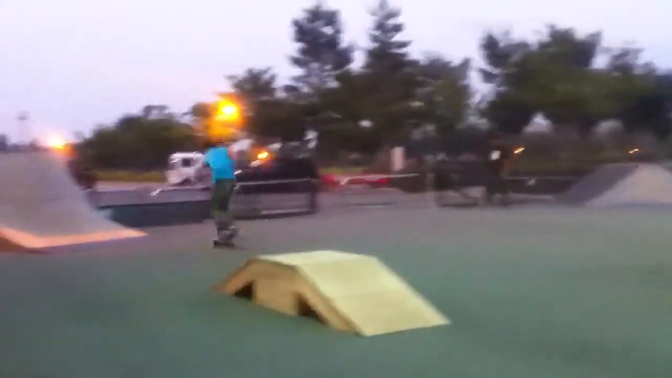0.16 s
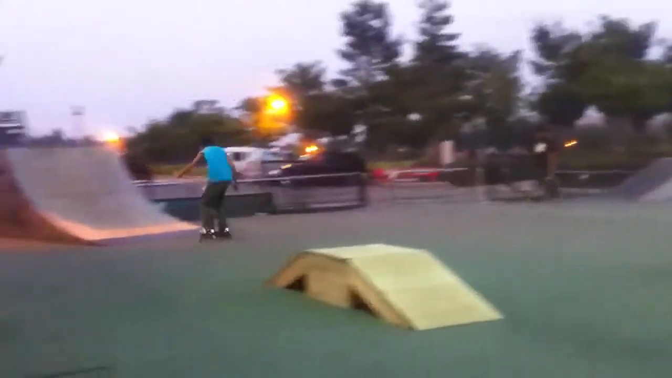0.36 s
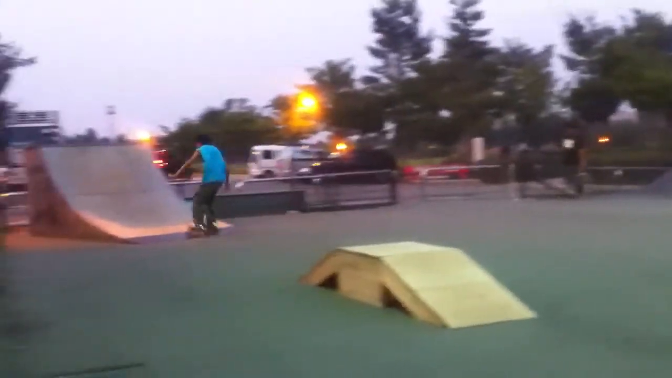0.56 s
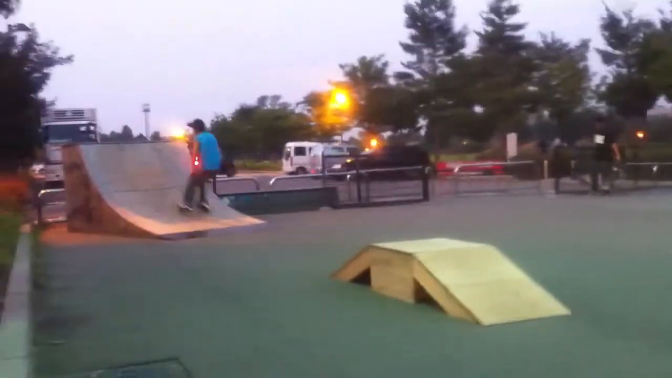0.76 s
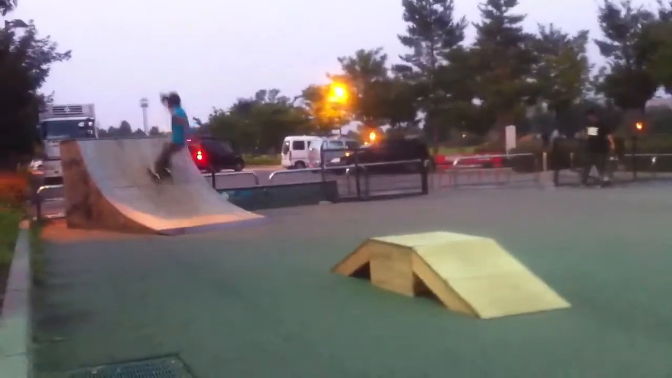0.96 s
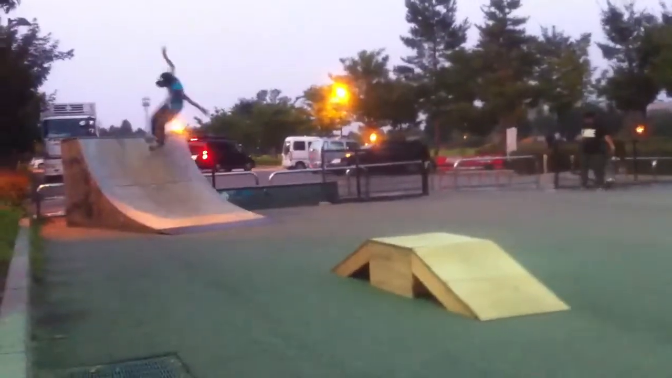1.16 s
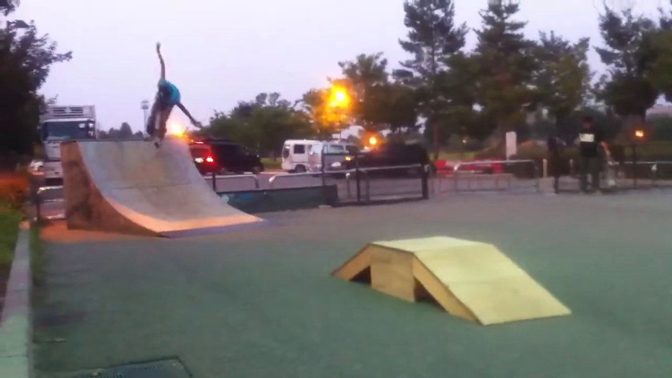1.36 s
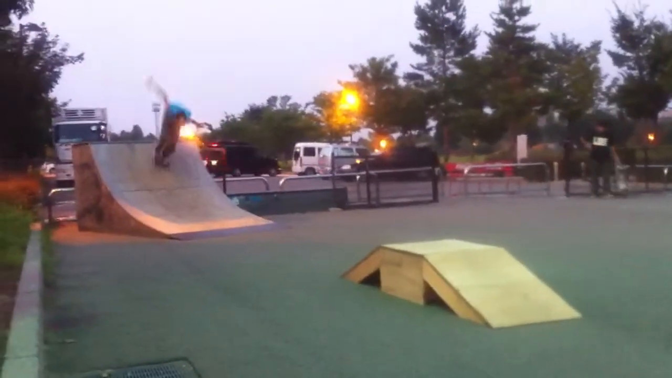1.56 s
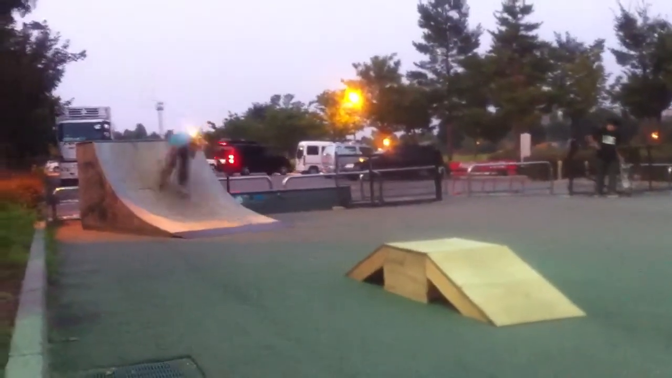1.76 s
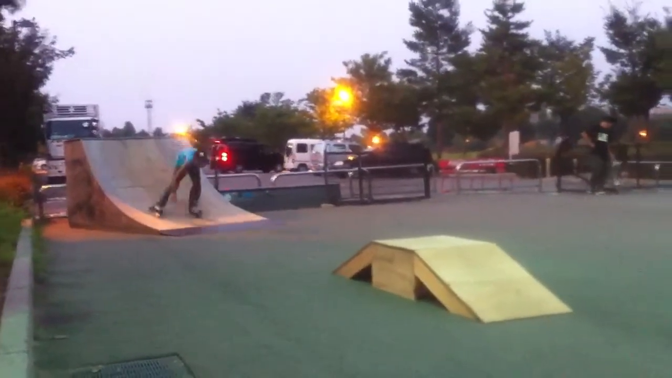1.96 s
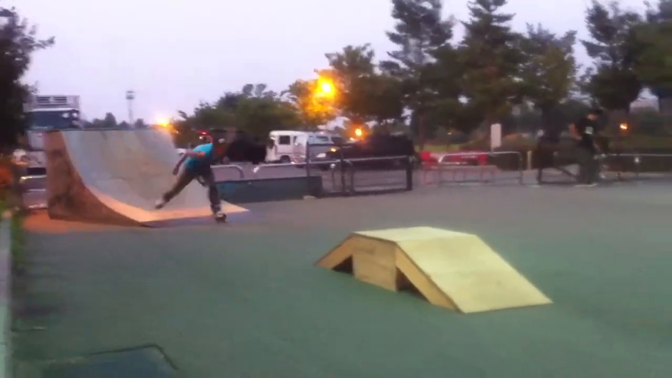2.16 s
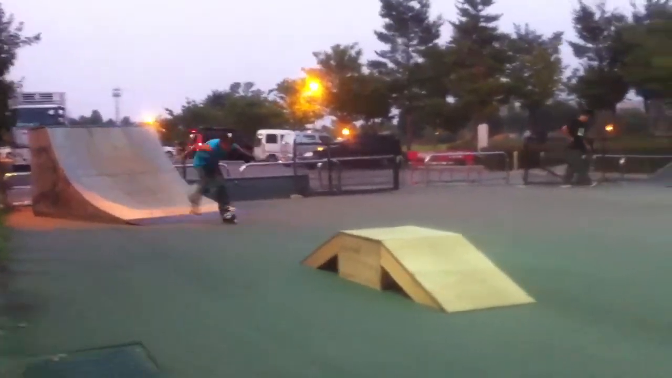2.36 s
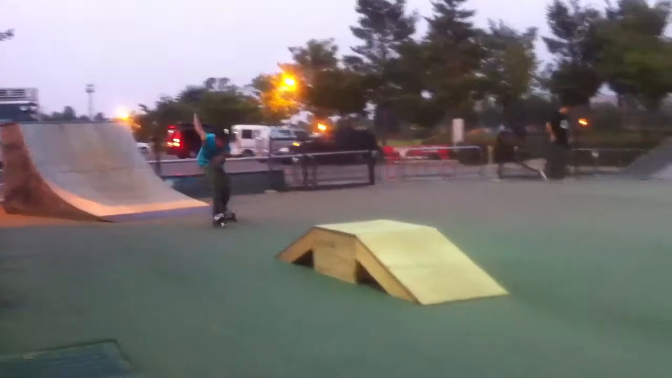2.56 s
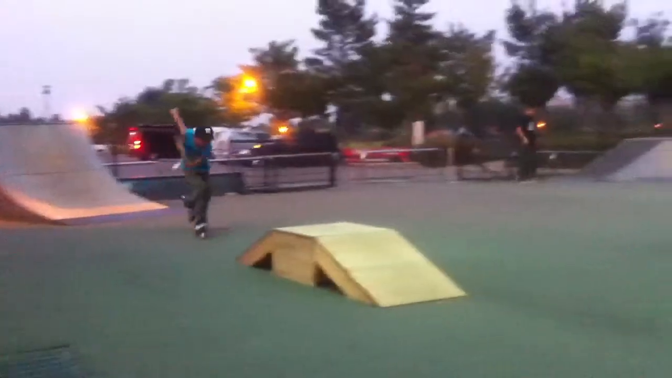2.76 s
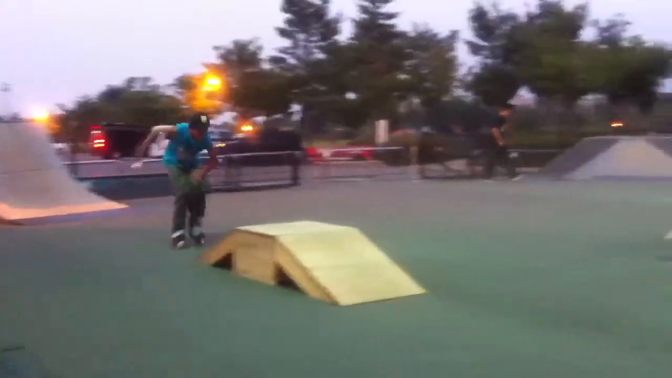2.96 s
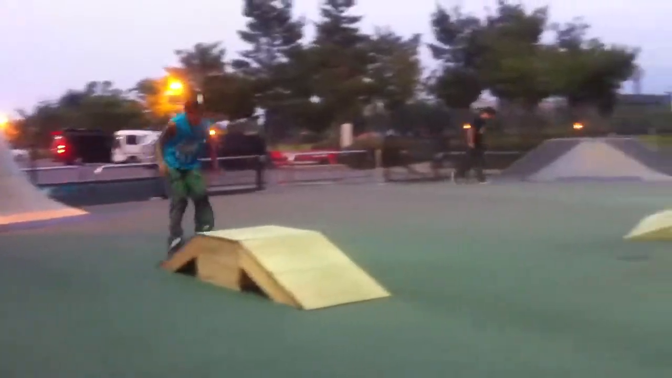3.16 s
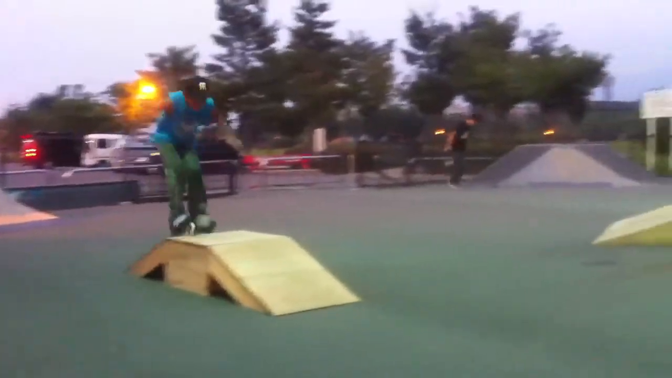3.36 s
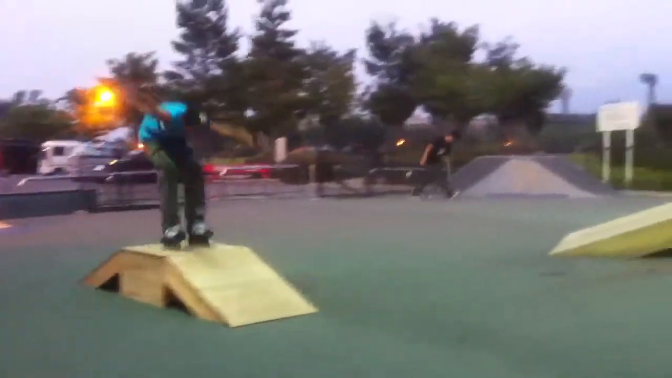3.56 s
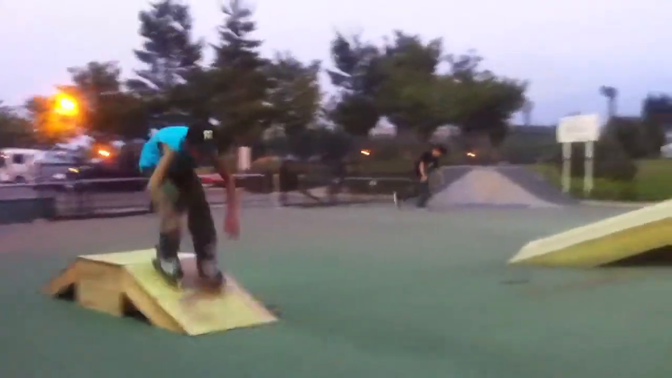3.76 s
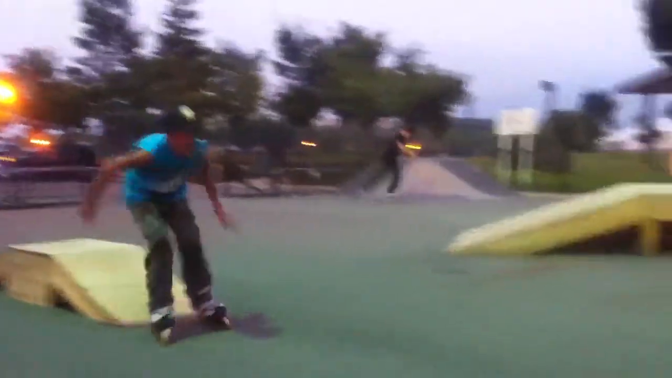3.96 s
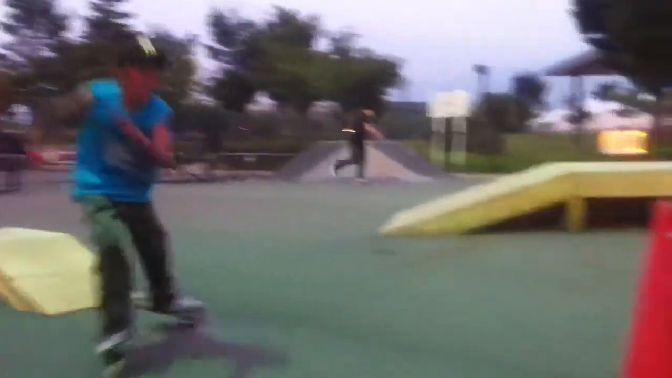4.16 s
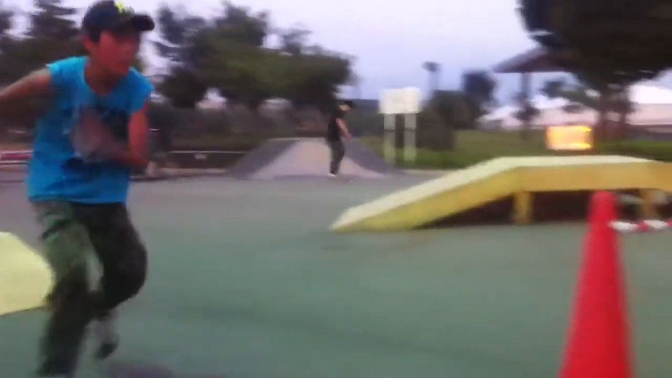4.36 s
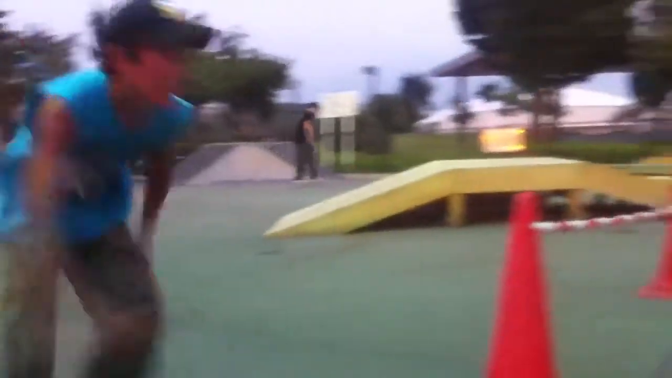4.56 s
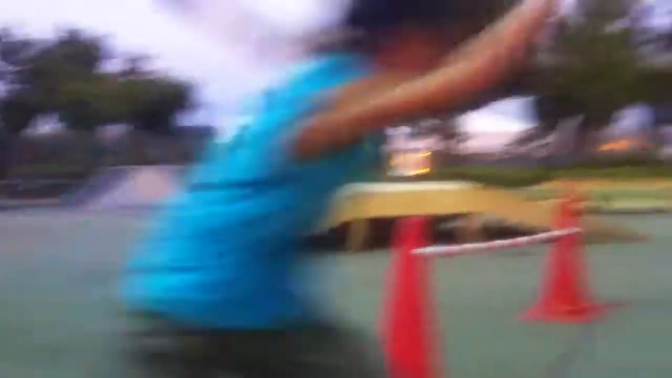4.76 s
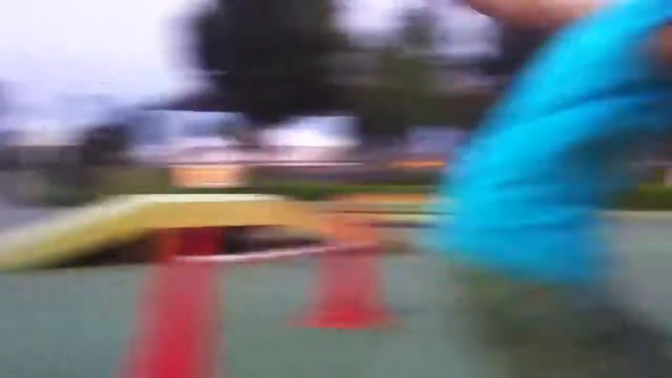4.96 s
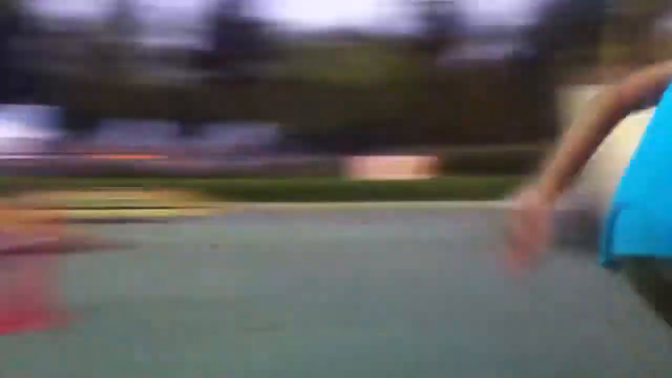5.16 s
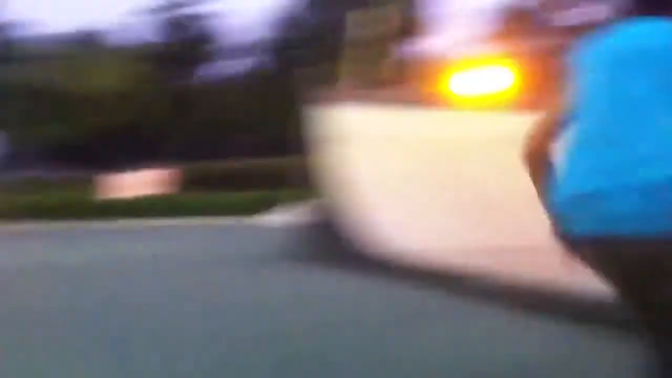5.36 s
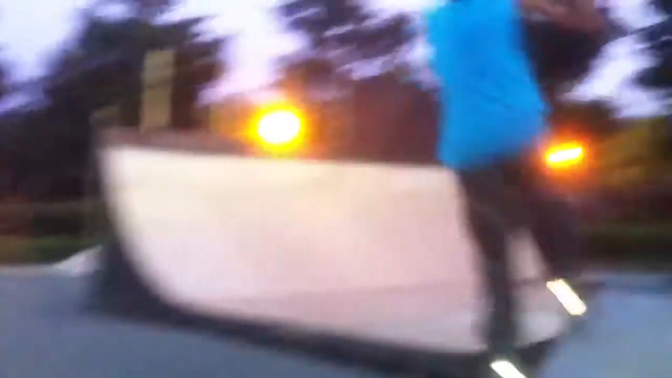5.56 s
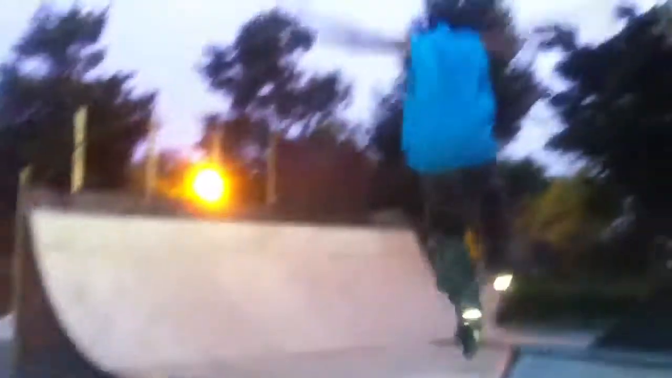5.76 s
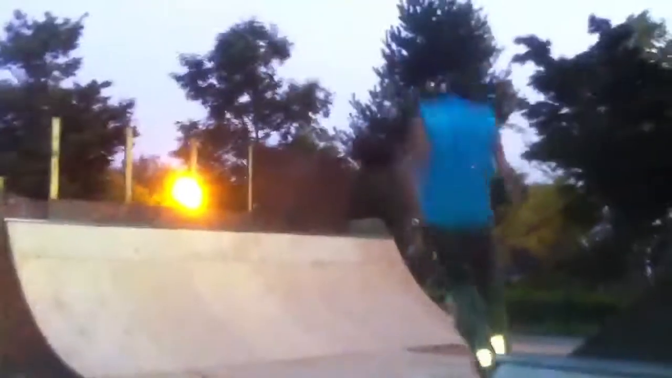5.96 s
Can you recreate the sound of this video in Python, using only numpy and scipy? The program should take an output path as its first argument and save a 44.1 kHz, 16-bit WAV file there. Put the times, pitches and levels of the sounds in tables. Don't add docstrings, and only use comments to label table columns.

```python
import sys
import numpy as np
from scipy import signal
from scipy.fft import rfft, irfft
from scipy.io import wavfile
from scipy.ndimage import uniform_filter1d

SR = 44100
rng = np.random.default_rng(int(sys.argv[2]) if len(sys.argv) > 2 else 0)


def gain_from_decibels(decibels):
    exponent = np.asarray(decibels, float) / 20
    return 10 ** exponent


def file_out(sig):
    cols = np.atleast_2d(sig).T
    lim = np.clip(cols, -1, 1)
    pcm = np.round(lim * 32767).astype(np.int16)
    wavfile.write(sys.argv[1], SR, pcm)


N = 264688
ON_NEAR_RAMP_S = 5.3


def evened(x):
    return x / np.sqrt(np.mean(x ** 2) + 1e-20)


def curve(rows):
    t, db = np.transpose(rows)
    return gain_from_decibels(np.interp(np.arange(N) / SR, t, db, left=-120, right=-120))


def swells(rows):
    coarse = np.arange(0, N + 32, 32)
    t = coarse / SR
    level = 0
    for peak_s, db, rise, fall in rows:
        away = np.maximum((peak_s - t) / max(rise, .002), (t - peak_s) / max(fall, .002))
        level = level + gain_from_decibels(db - 20 * away)
    return np.interp(np.arange(N), coarse, level)


def add(mix, s, sound):
    part = mix[round(s * SR):][:len(sound)]
    part += sound[:len(part)]


def highpass(x, order, hz):
    return signal.sosfilt(signal.butter(order, hz, "high", fs=SR, output="sos"), x)


def ring(x, modes):
    out = 0
    for hz, width, db in modes:
        pole = np.exp((2j * np.pi * hz - np.pi * width) / SR)
        mode = signal.lfilter([1 - abs(pole)], [1, -pole], x + 0j).real
        out = out + gain_from_decibels(db) * 2 * mode
    return out


def coloured(x, colour):
    hz, db = np.transpose(colour)
    bins = np.fft.rfftfreq(len(x), 1 / SR)
    gain = gain_from_decibels(np.interp(np.log(bins + 1), np.log(hz), db))
    return evened(irfft(rfft(x) * gain, len(x)))


def flutter(size, db):
    smooth = uniform_filter1d(uniform_filter1d(rng.standard_normal(N), size), size)
    return gain_from_decibels(db * evened(smooth))


def steadied(x, share):
    power = uniform_filter1d(x ** 2, size=900)
    return evened(x / (power + .02) ** (share / 2))


def grit(per_s, spread_db):
    size = gain_from_decibels(spread_db * np.minimum(rng.exponential(1, N), 5))
    return size * rng.standard_normal(N) * (rng.random(N) < per_s / SR)


# (f/Hz, level/dB)
WASH = [(15, -50), (25, -40), (53, -29), (138, -2.5), (213, -2), (338, -14), (783, -9.5), (872, -9.5),
        (1110, -12.5), (1540, -22.5), (2510, -26.5), (9230, -33), (15000, -59), (16300, -47)]
# (t/s, level/dB)
HUM = [(0, -62.5), (1.2, -57), (1.33, -53.5), (1.55, -53), (1.7, -54), (2.7, -57), (3.1, -94), (6, -50)]


def traffic():
    wash = coloured(rng.standard_normal(N), WASH) * flutter(size=3000, db=0.8)
    motor = evened(ring(rng.standard_normal(N), [(213, 5, 0)]))
    return gain_from_decibels(-55) * wash + curve(HUM) * steadied(motor, share=0.71)


# (f/Hz, level/dB)
PUFF_COLOUR = [(15, -2), (30, 10), (50, -1), (80, -1), (140, -45)]
# (peak t/s, level/dB, rise time/s per 20 dB, fall time/s per 20 dB)
PUFFS = [(.65, -64, 0.5, 1), (1.7, -58, -0.4, .08), (2.2, -67, -1.2, 0.7), (3.26, -56, .02, 0),
         (3.67, -61, 0.5, .08), (4.05, -62, -0.8, 0.4), (4.15, -68, 0.5, -0.5), (5.19, -67, 0.5, 0),
         (5.33, -52, 0, -1), (5.46, -48, 0.16, 0.5), (5.715, -60, -1.9, -1.7), (1.17, -62, -0.5, 0),
         (1.8, -60, 0, 0.5), (2.08, -62, -1.5, -0.2), (2.62, -62, -1.5, -0.5), (3.76, -62, -0.5, .06),
         (4.85, -61, 0, -0.5)]


def puffs():
    return coloured(rng.standard_normal(N), PUFF_COLOUR) * swells(PUFFS)


# (t/s, peak level/dB, centre f/Hz)
TICKS = [(0.481, -38.5, 3260), (1.047, -37.5, 3770), (1.7552, -36, 3080), (3.17, -41, 2270),
         (3.888, -44, 2310), (3.924, -39, 2380), (3.9968, -36, 2200), (4.817, -34, 2930),
         (4.9863, -47, 2260), (5.1783, -30, 2830), (5.789, -37, 2310)]
# (t/s, peak level/dB, centre f/Hz)
FINE_TICKS = [(0.046, -40.5, 7100), (.213, -46, 5540), (0.744, -37.5, 7600), (1.01, -41.5, 4620),
              (1.457, -37, 5800), (1.8023, -40, 5640), (1.8385, -39, 5200), (1.888, -46, 4790),
              (1.9644, -40.5, 5210), (2.061, -44, 5890), (2.1375, -45, 6130), (2.412, -49.5, 5560),
              (2.459, -42, 4750), (2.4698, -41, 4800), (2.786, -44, 4800), (4.9094, -45, 7490),
              (5.161, -40, 4720), (5.8661, -41.5, 5400), (5.9685, -42, 11000)]


def ticks():
    out, t = np.zeros(N), np.arange(2048) / SR
    for s, db, hz in TICKS + FINE_TICKS:
        t60 = 0.016 * (2500 / hz) ** 0.31
        colour = [(hz / 4, -32), (hz / 1.3, -7), (hz, 0), (hz * 1.3, -5), (hz * 4, -22)]
        puff = coloured(rng.standard_normal(len(t)), colour)
        add(out, s - .001, puff * gain_from_decibels(db - 4 - 60 * t / t60) * np.minimum(t * 1500, 1))
    return out


def rattle(rows, top_hz, tilt):
    t, out = np.arange(700) / SR, 0
    for hz in np.geomspace(900, top_hz, num=15):
        clink = np.sin(2 * np.pi * hz * t) * gain_from_decibels(-60 * t / 0.014)
        out = out + signal.oaconvolve(grit(300, 1.5), clink)[:N] * (1000 / hz) ** tilt
    return evened(out) * curve(rows)


# (t/s, level/dB)
BOX_RATTLE = [
    (3.68, -80),
    (3.75, -59),
    (3.85, -51.5),
    (3.95, -47.5),
    (4.05, -53),
    (4.12, -87),
]
# (t/s, level/dB)
JIGGLE = [
    (4.1, -70),
    (4.3, -63),
    (4.6, -61),
    (4.8, -54),
    (5.0, -47),
    (5.15, -61),
    (5.29, -58),
]


def loose_parts():
    return rattle(BOX_RATTLE, top_hz=5200, tilt=0.59) + rattle(JIGGLE, top_hz=2670, tilt=0.76)


# (t/s, peak level/dB, f/Hz, t60/s)
KNOCKS = [(1.7065, -14, 500, 0.014), (1.709, 1, 334, 0.015), (3.296, -21, 997, 0.027),
          (4.143, -14, 956, 0.029), (4.144, -24.5, 626, 0.036), (4.159, -29, 930, 0.023),
          (4.734, -27, 420, .03), (4.051, -29, 610, .03), (4.064, -36, 1600, 0.031),
          (5.1842, -28, 304, 0.091), (5.184, -27, 1050, .025), (1.742, -30, 480, .04),
          (5.185, -29, 730, 0.027), (5.222, -27, 710, .02)]
# (t/s, peak level/dB, f/Hz, t60/s)
PINGS = [(2.615, -31, 1746, .024), (3.671, -31, 2030, 0.02), (4.0458, -26.5, 1610, 0.027),
         (5.1781, -8, 2400, 0.0069), (5.1781, -19, 3200, 0.005), (.631, -34, 4700, .015),
         (.631, -26, 5200, .02), (.631, -29, 3150, .035), (.7545, -46, 3200, .02), (.7545, -35, 4600, .02),
         (4.143, -28, 1650, .03), (3.297, -34, 1680, 0.028), (3.258, -28, 860, .03),
         (5.1765, -27, 1790, 0.04), (5.188, -32, 1840, 0.036), (1.6906, -29, 3130, .012),
         (1.707, -20, 1430, .012)]
# (t/s, peak level/dB, f/Hz, t60/s)
CLINKS = [(3.69, -50, 4200, .012), (3.716, -36, 1130, 0.055), (3.719, -47, 2670, .03),
          (3.743, -45, 4250, .02), (3.772, -36, 1140, .04), (3.773, -36, 2300, .02),
          (3.776, -39, 2700, .025), (3.803, -42, 4540, .015), (3.823, -44, 3320, 0.013),
          (3.833, -39, 3600, 0.016), (3.888, -38, 2320, .02), (3.893, -47, 4640, 0.027),
          (3.922, -37, 1590, .03), (3.948, -46, 3900, .02), (3.955, -42, 2500, .02),
          (3.968, -50, 5200, .02), (3.9966, -29, 2280, 0.016), (3.998, -36, 900, .02),
          (4.014, -33, 3400, 0.014)]
# (t/s, peak level/dB, f/Hz, t60/s)
SKIN_KNOCKS = [(5.312, -19, 670, 0.047), (5.308, -17, 2215, 0.022), (5.339, -17, 1900, .01),
               (5.361, -17, 900, 0.0076), (5.3722, -8, 1490, .005), (5.409, -15, 1900, .008),
               (5.449, -13, 1800, .01), (5.406, -16.5, 1080, 0.038), (5.443, -17, 1060, 0.037),
               (5.497, -18, 1880, 0.038), (5.5, -14, 1000, 0.027), (5.512, -27, 2300, .03),
               (5.517, -11.5, 830, 0.061), (5.526, -14, 1140, 0.023), (5.548, -18, 850, 0.051),
               (5.563, -22, 830, 0.027), (5.564, -17, 1370, .025), (5.59, -20, 1800, 0.035),
               (5.631, -15.5, 774, .03), (5.636, -28, 1490, .02), (5.776, -30, 880, 0.067),
               (5.669, -34, 1200, 0.01), (5.712, -35, 700, 0.014)]


def knocks():
    out, t = np.zeros(N), np.arange(4096) / SR
    for s, db, hz, t60 in KNOCKS + PINGS + CLINKS + SKIN_KNOCKS:
        pair = np.sin(2 * np.pi * hz * t) + 0.13 * np.sin(2 * np.pi * 1.19 * hz * t)
        attack = 1 - np.exp(-t / 0.00051)
        add(out, s, gain_from_decibels(db - 1.5 - 60 * t / t60) * pair * attack)
    return highpass(out, 2, 90)


# (t/s, crack level/dB, boot knock level/dB, t60/s)
ON_WOOD = [
    (0.6293, -23, -33.5, 0.081),
    (1.6831, -22, -19.5, 0.03),
    (3.2477, -48, -37, 0.14),
    (3.2951, -25, -32, 0.04),
    (5.1777, -25, -35, 0.07),
    (5.3048, -15, -18, 0.049),
    (5.3721, -15, -25, 0.14),
]
ON_SEAMS = [
    (0.0458, -23, -55, 0.015),
    (0.4125, -21, -47, 0.048),
    (0.4242, -30, -63, 0.08),
    (1.7063, -2.5, -19, 0.015),
    (3.1073, -24, -35, 0.041),
    (4.0425, -20, -27, 0.05),
    (4.732, -17.5, -48, 0.057),
    (5.3983, -6.5, -47, 0.076),
    (5.438, -32, -21, 0.043),
    (5.5644, -34, -17.5, 0.13),
]
ON_EDGES = [(0.3429, -30.5, -39, 0.11), (1.0787, -30, -59, 0.052), (1.1428, -29.5, -44, 0.026),
            (1.7263, -25.5, -51, 0.048), (2.616, -18.5, -27, 0.014), (3.66, -39, -33, 0.027),
            (3.6696, -20, -28, 0.019), (3.77, -30.5, -41, 0.052), (3.9669, -29.5, -50, 0.15),
            (4.0124, -24, -25, 0.029), (5.0189, -30, -39.5, 0.13), (5.3394, -33, -15.5, 0.067),
            (5.684, -34, -40, 0.035)]
ON_FRAMES = [
    (1.557, -41.5, -45, 0.11),
    (3.715, -34.5, -35.5, 0.063),
    (5.4828, -6, -23, 0.04),
]
ON_AXLES = [
    (4.142, -21.5, -29.5, 0.08),
    (4.186, -31.5, -37.5, 0.081),
]
# (knock f/Hz, treble tilt/dB)
STRUCK = [(797, -23), (850, -7), (880, 2.5), (1030, 25.5), (1000, 15)]


def clacks():
    out, t = np.zeros(N), np.arange(8192) / SR
    attack = np.minimum(t / 0.0024, 1)
    for rows, (hz, tilt) in zip([ON_WOOD, ON_SEAMS, ON_EDGES, ON_FRAMES, ON_AXLES], STRUCK):
        colour = [(700, 13), (2200, 4.5), (5000, .5 * tilt), (11000, tilt), (15500, tilt - 7), (16300, -68)]
        for s, db, knock_db, t60 in rows:
            crack = coloured(rng.standard_normal(len(t)), colour)
            crack *= gain_from_decibels(-60 * t / t60) + gain_from_decibels(-13 - 60 * t / (5 * t60))
            shell = evened(ring(rng.standard_normal(len(t)), [(hz * 0.93, 700, 0)]))
            knock = 0.29 * np.sin(2 * np.pi * hz * t) + 0.48 * shell
            knock *= gain_from_decibels(-60 * t / (0.94 * t60))
            add(out, s - .001, (gain_from_decibels(db - 14) * crack + gain_from_decibels(knock_db + 2) * knock) * attack)
    return out


# (t/s, peak level/dB, t60/s)
PLATE_HITS = [
    (0.632, -28, 0.086),
    (0.645, -46, 0.033),
    (0.6756, -36.5, 0.048),
    (0.7, -53, 0.046),
    (.712, -49, .03),
    (.732, -45, 0.052),
    (0.7534, -33, 0.079),
    (0.781, -40, 0.047),
    (.797, -50, .04),
    (2.193, -38, 0.053),
]
# (f/Hz, width/Hz, level/dB)
PLATE_MODES = [(2243, 58, -2.5), (3220, 160, -0.5), (3820, 160, -8), (4620, 200, -1.5), (5110, 180, -5.5),
               (6100, 330, -14)]
# (f/Hz, level/dB)
CHATTER = [(400, -50), (1200, -19), (2600, 2), (5500, 0), (9000, -4), (15500, -30), (16300, -70)]
# (t/s, level/dB)
SKID = [
    (2.185, -47),
    (2.193, -31.5),
    (2.227, -35.5),
    (2.273, -51),
    (2.393, -73),
]
# (f/Hz, level/dB)
SKID_COLOUR = [(240, -15), (400, -0.5), (1710, -9), (1870, -13), (2090, -10.5), (4650, -11.5), (11000, -20),
               (16000, -36)]


def plate():
    out, t = np.zeros(N), np.arange(8192) / SR
    for s, db, t60 in PLATE_HITS:
        burst = coloured(rng.standard_normal(len(t)), CHATTER) * gain_from_decibels(db - 60 * t / t60)
        spot = rng.standard_normal((len(PLATE_MODES), 2))
        modes = [(hz * (1 + 0.0074 * shift), width, mode_db + 2 * lift)
                 for (hz, width, mode_db), (shift, lift) in zip(PLATE_MODES, spot)]
        add(out, s - .001, gain_from_decibels(3.5) * ring(burst, modes) + gain_from_decibels(-11.5) * burst)
    skid = coloured(grit(9000, 0.95), SKID_COLOUR) * curve(SKID)
    return out + skid + gain_from_decibels(7) * ring(skid, PLATE_MODES)


# (t/s, peak level/dB, main panel f/Hz, t60/s)
SLAPS = [(.658, -33, 213, 0.32), (1.002, -31, 196, 0.27), (1.085, -32, 147, 0.18), (1.685, -12, 288, 0.1),
         (1.831, -33, 143.3, 0.24), (1.884, -35.5, 251, 0.12), (2.016, -29, 127, 0.089),
         (2.193, -28, 240.2, 0.24), (2.608, -32, 203, 0.05), (3.106, -31, 306, 0.019),
         (3.261, -22, 230, 0.2), (3.296, -13.5, 192, 0.059), (3.336, -22, 237, 0.035),
         (3.532, -34, 153, 0.145), (3.669, -13.5, 208, 0.045), (3.966, -33, 215, 0.19),
         (4.011, -27, 250, 0.066), (4.044, -22.5, 304, 0.15), (4.728, -35, 277, 0.075),
         (5.334, -29, 173, 0.084)]
# (t/s, peak level/dB, main panel f/Hz, t60/s)
PUSHES = [(.89, -42, 189, 0.16), (1.054, -30.5, 304, 0.078), (1.714, -15, 280, 0.075),
          (1.962, -34, 192, 0.05), (2.249, -25, 280, 0.036), (3.2493, -12, 215, 0.11),
          (3.272, -17.5, 186, 0.14), (3.369, -25.5, 192, 0.034), (3.595, -30, 154, 0.14),
          (3.659, -16, 231, 0.029), (3.694, -25.5, 200, 0.072), (3.82, -34, 170, 0.054),
          (4.055, -24, 227, 0.06)]
# (ratio to main f, level/dB)
OVERTONES = [(0.994, 6.5), (1.371, 2), (1.666, -5.5), (4.1, -25), (0.741, -2)]
# (f/Hz, level/dB)
SLAP_COLOUR = [(250, 6), (500, 0.5), (900, -0.5), (1300, -17), (2500, -20), (5000, -35)]


def thumps():
    out, t = np.zeros(N), np.arange(SR // 3) / SR
    for rows, slap_share_db in [(SLAPS, -7.5), (PUSHES, -20.5)]:
        for s, db, hz, t60 in rows:
            body = 0
            for ratio, mode_db in OVERTONES:
                mode_hz = hz * ratio * rng.uniform(1.0, 1.05)
                body = body + gain_from_decibels(mode_db - 60 * t * ratio / t60) * np.sin(2 * np.pi * mode_hz * t)
            body *= 1 - np.exp(-t / 0.0036)
            slap = coloured(rng.standard_normal(len(t)), SLAP_COLOUR)
            slap *= gain_from_decibels(db + slap_share_db - 0.5 - 60 * t / (0.94 * t60))
            slap *= 1 - np.exp(-t / 0.0027)
            add(out, s - .0005, gain_from_decibels(db) * body / abs(body).max() + slap)
    return highpass(out, 3, 120)


# (peak t/s, level/dB, rise time/s per 20 dB, fall time/s per 20 dB,
# f/Hz)
SWAYS = [(5.361, -22, .04, .04, 177), (5.462, -18, .1, .12, 178), (5.525, -24, 0.09, .08, 178),
         (5.605, -26, .1, .08, 172), (5.423, -19, .09, .2, 243), (5.652, -29, 0.09, 0.06, 240),
         (4.071, -22, .035, .05, 178), (1.07, -41, 0.27, .2, 136), (1.012, -36.5, .03, .05, 200),
         (5.49, -26, 0.14, .1, 305), (5.6, -31, .15, .15, 450), (5.61, -30, .05, .06, 310)]


def sways():
    turns = np.cumsum(flutter(size=2500, db=0.3)) / SR
    return np.sqrt(2) * sum(swells([row[:4]]) * np.sin(2 * np.pi * row[4] * turns) for row in SWAYS)


def drumming(panels, per_s, spread_db):
    hollow = ring(ring(grit(per_s, spread_db), panels), [(194, 152, 0)])
    return evened(highpass(hollow, 2, min(panels)[0] * 1.06))


# (f/Hz, width/Hz, level/dB)
FAR_PANELS = [(99, 39, -2), (147, 55, 9), (192, 40, 6.5), (267, 38, -14), (330, 18, 3.5), (515, 170, -36)]
# (f/Hz, width/Hz, level/dB)
BOX_PANELS = [(158, 26, 6.5), (186, 61, 9.5), (250, 2.7, -3), (304, 24, 0), (398, 53, -5)]
# (peak t/s, level/dB, rise time/s per 20 dB, fall time/s per 20 dB)
PASSES = [
    (.68, -45, -0.3, -0.08),
    (.99, -40.5, 0.5, 0.17),
    (1.75, -41, 0, 0.6),
    (1.88, -43.5, -0.24, 0.58),
    (3.25, -55.5, 0, 0),
    (3.65, -50.5, 0.5, 0),
    (3.84, -36.5, 0.36, 0.3),
    (4.02, -42, 0.4, 0.34),
    (4.95, -44, .5, 1.5),
]


def plywood_drum():
    on_far_ramp = np.arange(N) < 2.5 * SR
    drum = np.where(on_far_ramp, drumming(FAR_PANELS, 400, 2.5), drumming(BOX_PANELS, 400, 0.75))
    return steadied(drum, share=0.71) * swells(PASSES) * (np.arange(N) < ON_NEAR_RAMP_S * SR)


# (f/Hz, level/dB)
RUMBLE = [(70, -33), (180, -2.5), (300, 9), (375, 3), (442, 4.5), (816, 3), (1230, -6.5), (1650, -1.5),
          (2680, -14), (5000, -15), (6500, -58), (11000, -120)]
# (t/s, level/dB)
WHEELS = [(0, -56.5), (.13, -57.5), (.34, -53.5), (.57, -53.5), (.68, -46), (.82, -51.5), (.99, -47.5),
          (1.18, -58), (1.6, -56), (1.86, -50), (2.11, -51.5), (2.35, -56.5), (3.22, -55), (3.6, -59),
          (3.84, -46.5), (4.28, -50), (4.89, -44.5), (5.3, -42), (5.34, -54), (5.8, -50.5), (6.01, -57.5)]
# (f/Hz, level/dB)
BEARINGS = [(1760, -51), (3000, 5.5), (3870, 3.5), (4190, -16), (5140, 2), (7170, 2.5), (10400, 2.5),
            (15100, 0.5), (15900, -8), (16300, -18)]
# (t/s, level/dB)
RACES = [
    (0, -8),
    (3.8, -8),
    (4.0, 4),
    (4.55, 1),
    (4.75, -6),
    (5.05, 0),
    (5.3, -8),
]
# (t/s, level/dB)
FACING = [
    (0, -12.5),
    (3.7, -12.5),
    (4.35, -8),
    (4.8, -9.5),
    (5.3, -10.5),
    (6.01, -11.5),
]
# (f/Hz, width/Hz, level/dB)
FRAME = [(1800, 180, 4.5), (2120, 97, -6), (830, 140, -2)]
# (t/s, level/dB)
FRAME_LEVEL = [(.3, -75), (.42, -63), (.85, -65), (1.0, -80), (2.6, -76.5), (2.66, -60), (2.8, -69),
               (3.1, -85), (4.2, -75), (4.6, -62), (4.9, -53), (5.1, -60), (5.22, -58), (5.3, -46)]


def wheels(fine, tread):
    hiss = coloured(tread, BEARINGS)
    hiss += ring(hiss, [(10250, 900, -1.5)]) * curve(RACES)
    rumble = coloured(fine, RUMBLE)
    return (rumble + hiss * curve(FACING)) * curve(WHEELS) + evened(ring(fine, FRAME)) * curve(FRAME_LEVEL)


# (start t/s, length/s, start level/dB, end level/dB)
SLIDES = [
    (5.308, 0.043, -20.5, -33.5),
    (5.389, 0.065, -50, -21.5),
    (5.483, 0.19, -15, -31.5),
    (5.69, 0.074, -36, -45.5),
    (5.789, 0.027, -44, -51.5),
    (5.308, 0.53, -46, -80.5),
]


def slides():
    bite_s, let_go_s = 0.0044, 0.032
    coarse, level = np.arange(0, N + 32, 32), 0
    for s, length, db, end_db in SLIDES:
        times = [s - bite_s * 3, s, s + length, s + length + let_go_s * 3]
        level = level + gain_from_decibels(np.interp(coarse / SR, times, [db - 54, db, end_db, end_db - 62.5]))
    return np.interp(np.arange(N), coarse, level)


# (f/Hz, width/Hz, level/dB)
NEAR_PANELS = [(150, 30, -4), (205, 60, -6.5), (306, 63, -5.5), (435, 56, -5.5)]
# (peak t/s, level/dB, rise time/s per 20 dB, fall time/s per 20 dB)
FLEX = [
    (5.36, -28, -0.04, 0.2),
    (5.415, -25, 0, 0.08),
    (5.48, -25.5, 0.17, 0.15),
    (5.662, -34, 1.7, 0.2),
    (5.72, -40.5, -3, 0.6),
]
# (f/Hz, width/Hz, level/dB)
DECK = [(850, 120, 1), (1060, 98, -12), (1813, 75, -0.5), (2193, 140, 0.5)]
# (f/Hz, level/dB)
RUMBLE_NEAR = [(240, -43), (400, -3), (445, 0.5), (715, -3), (847, -1.5), (1600, -5), (1830, -7),
               (3530, -18.5), (5000, -18), (6500, -19), (11000, -120)]
# (f/Hz, level/dB)
HISS = [(1760, -12), (3000, -9.5), (4010, -11.5), (5360, -5), (6730, -9.5), (8090, -4.5), (9320, -5.5),
        (11400, 0), (15300, -12), (16300, -44)]


def near_ramp(fine, tread):
    arrived = np.arange(N) >= ON_NEAR_RAMP_S * SR
    flex, slide = swells(FLEX) * arrived, slides() * arrived
    drum = steadied(drumming(NEAR_PANELS, 1500, 0.37), share=.7) * flex
    skin = coloured(fine, RUMBLE_NEAR) + gain_from_decibels(-4.5) * evened(ring(grit(2000, 0.97), DECK))
    keep = np.exp(-1 / (0.01 * SR))
    lagged = signal.lfilter([1 - keep], [1, -keep], slide)
    skin = evened(skin) * flutter(size=500, db=1.0) * gain_from_decibels(-8) * lagged ** 0.53 * flex ** 0.23
    return drum + skin + coloured(tread, HISS) * slide * flutter(size=600, db=0.9)


def rolling():
    fine = grit(6000, 1.73) * flutter(size=500, db=-0.5)
    tread = grit(20000, 2.3) * flutter(size=400, db=0.5)
    return plywood_drum() + wheels(fine, tread) + near_ramp(fine, tread)


# (delay t/s, level/dB)
ECHOES = [
    (.005, -13.5),
    (.011, -13),
    (.016, -19),
]


def park(x):
    t = np.arange(SR // 4) / SR
    taps = rng.choice([-1., 1.], len(t)) * (rng.random(len(t)) < .04)
    taps *= gain_from_decibels(-60 * t / 0.37) * (t > .018)
    taps *= gain_from_decibels(-6.5) / np.linalg.norm(taps)
    for s, db in ECHOES:
        taps[round(s * SR)] = gain_from_decibels(db)
    returns = signal.oaconvolve(x, taps)[:N]
    return signal.sosfilt(signal.butter(1, 8400, fs=SR, output="sos"), returns)


def scene():
    hits = highpass(clacks() + ticks(), 2, 250)
    thuds, steel = thumps(), plate()
    returns = park(hits + gain_from_decibels(-7.5) * thuds + gain_from_decibels(-4.5) * steel)
    background = traffic() + puffs()
    struck = hits + thuds + steel + knocks() + returns
    return (background + struck + loose_parts() + sways() + rolling())[None]


def low_pass(x):
    return signal.sosfilt(signal.butter(12, 16460, fs=SR, output="sos"), x)


def record(dry):
    thin = highpass(dry, 1, 60)
    limit = .9
    thin = limit * np.tanh(thin / limit)
    mix = signal.oaconvolve(thin, signal.firwin(701, 15900, fs=SR)[None], "same")
    return low_pass(mix)


dry = scene()
out = record(dry)
file_out(out)
```